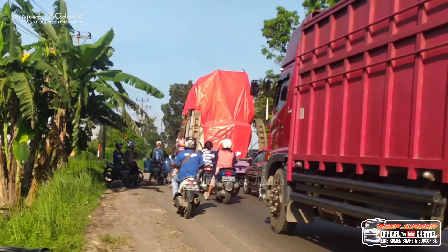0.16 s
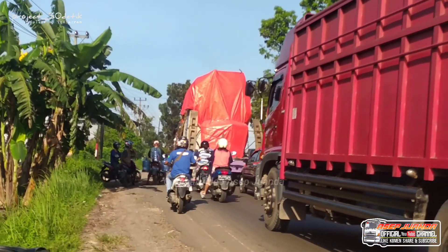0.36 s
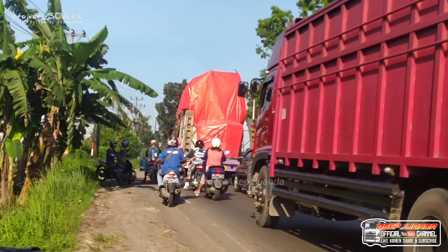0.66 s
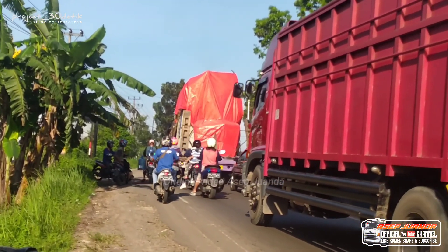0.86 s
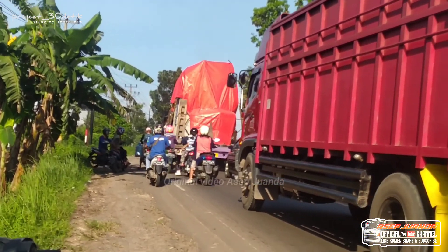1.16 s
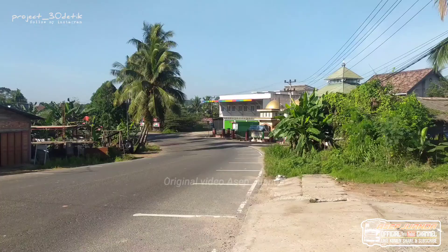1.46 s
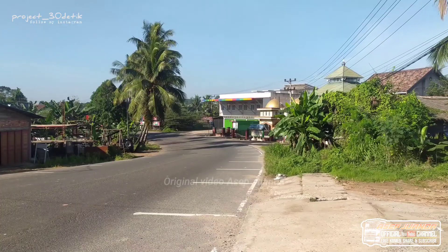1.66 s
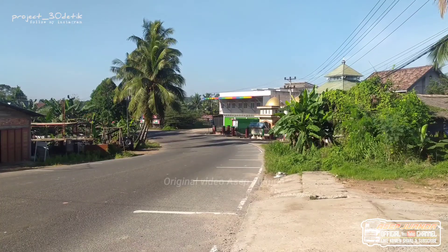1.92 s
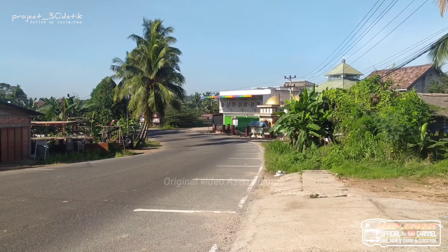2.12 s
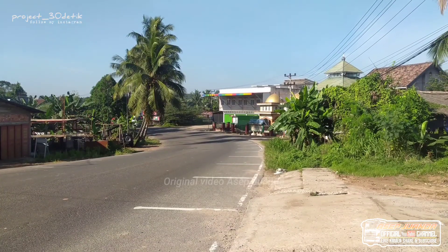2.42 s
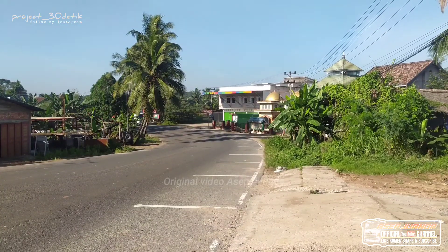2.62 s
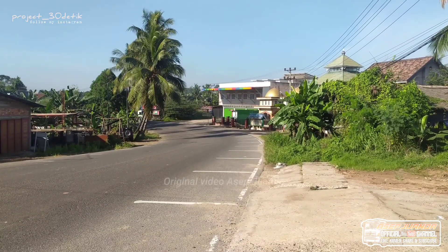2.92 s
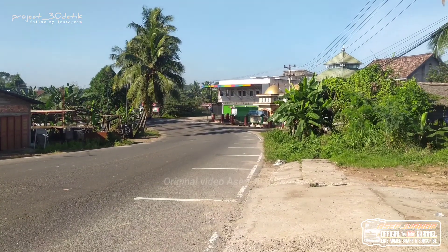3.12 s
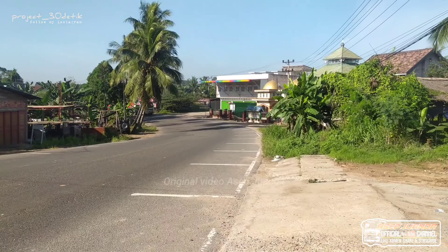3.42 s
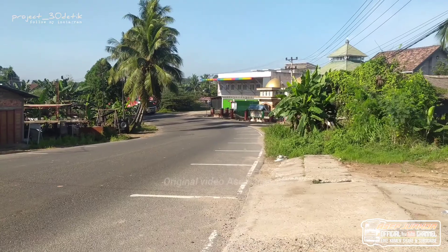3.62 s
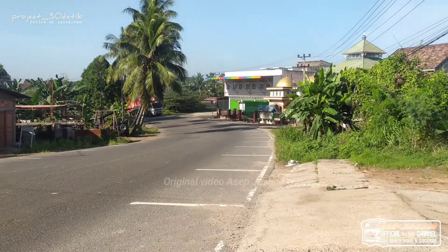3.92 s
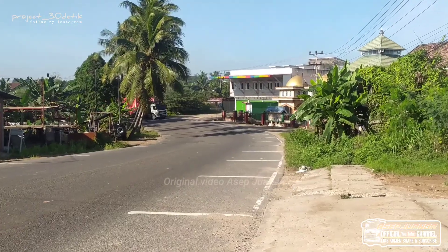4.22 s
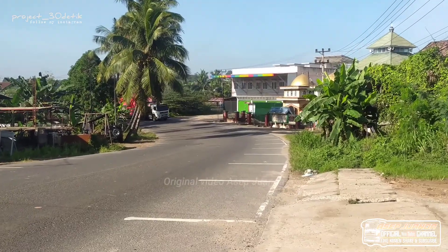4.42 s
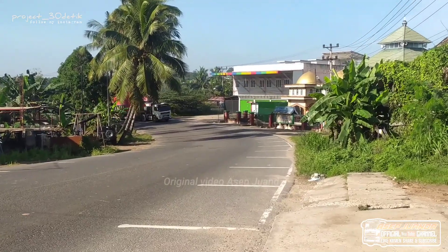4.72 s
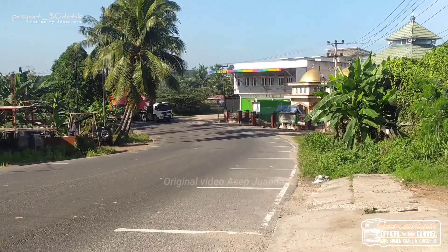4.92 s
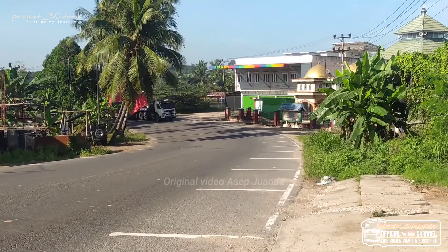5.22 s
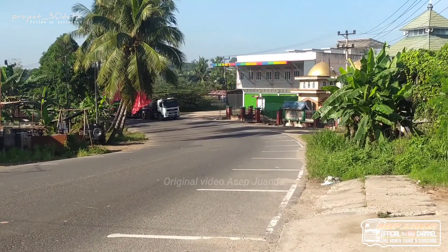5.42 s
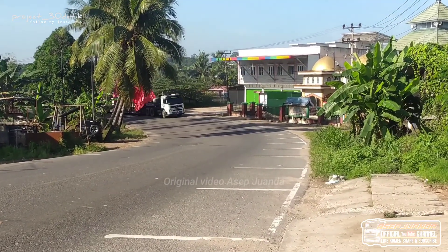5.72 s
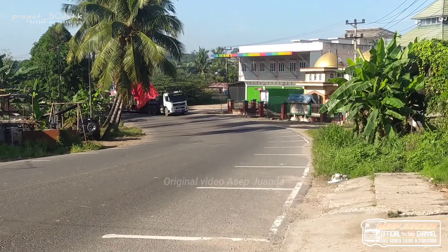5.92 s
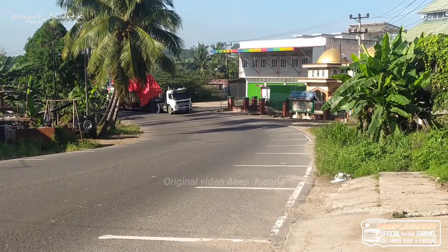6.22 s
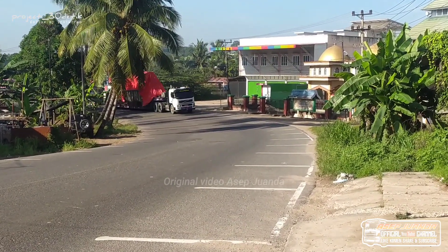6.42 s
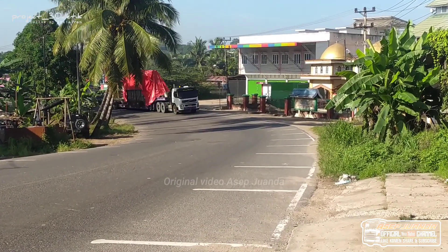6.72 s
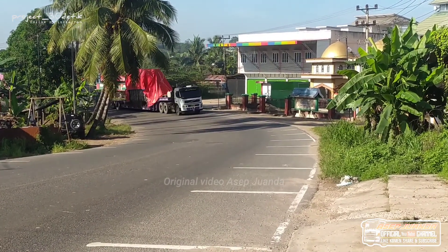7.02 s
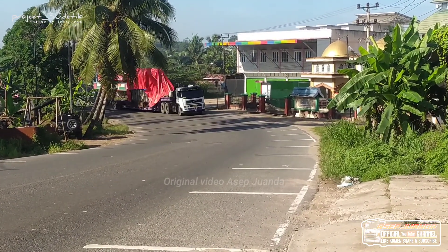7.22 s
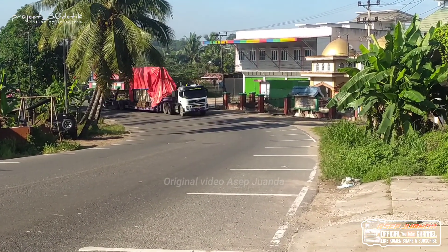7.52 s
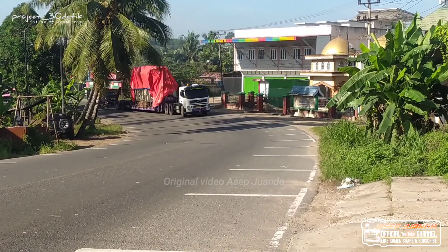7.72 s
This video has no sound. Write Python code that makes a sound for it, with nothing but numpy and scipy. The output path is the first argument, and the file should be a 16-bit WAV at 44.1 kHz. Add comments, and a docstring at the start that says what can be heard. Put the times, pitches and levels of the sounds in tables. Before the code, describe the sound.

A heavy diesel truck throbs and clatters past up close, brief silence, then a loaded truck labours nearer with droning fan while a motorbike idles.

```python
"""Trucks on a roadside

Two moments with a short silence between them. First a diesel truck creeps past at arm's length:
sines make its exhaust note, which throbs against a second engine; shaped noise makes its clatter and hiss.
Then a loaded truck labours up from a far bend: noise and pulses make its roar, sines its fan and turbo whistle.
A motorbike idles close by in low puffs, birds and insects call in gliding tones and noise,
and something metal clinks: a crack of noise and a few ringing tones."""
import sys
import numpy as np
from scipy import signal
from scipy.fft import rfft, irfft, next_fast_len
from scipy.io import wavfile

SR = 44100
rng = np.random.default_rng(int(sys.argv[2]) if len(sys.argv) > 2 else 0)


def materialize(psi):
    """Save the field psi as 16-bit PCM at rate SR to the path in sys.argv[1].

    A 1-D psi becomes a single channel; in a 2-D psi each row is a channel.
    """
    bounded = np.clip(np.atleast_2d(psi).T, -1, 1)
    quanta = np.round(bounded * 32767).astype(np.int16)
    wavfile.write(sys.argv[1], SR, quanta)


N = 346626
TIME = np.arange(N) / SR

NEAR_END_S, FAR_START_S = 1.428, 1.758
CUTOFF_HZ = 15700
# how much later the sound arrives on the left
NEAR_LAG_S, FAR_LAG_S = -0.000095, 0.000088

# exhaust notes of the two engines in the queue: multiple of the firing rate, level/dB
NEAR_ORDERS = [(1, -26.5), (2, -30), (3, -40.5), (4, -40.5)]
SECOND_ORDERS = [(1, -23.5), (2, -45), (3, -44)]
# a fainter tone at the sum of the two firing rates, and a slow shake at half the second one
SUM_TONE_DB, SHAKE_DB = -38.5, -43.5
# both engines ease off: from t/s, to t/s, firing rate before f/Hz, after f/Hz
NEAR_SLOWING = (0.17, 1.2, 40.4, 38.4)
SECOND_SLOWING = (0.25, 0.95, 49.8, 45.3)
# the near truck's engine moves away, so these layers fade: level at first/dB, loss/dB per s
NEAR_RUMBLE, NEAR_CLATTER, NEAR_AIR = (-25.5, 1.4), (-27.5, 2.05), (-31.0, 4)
# tone colours of those layers: f/Hz, relative level/dB per Hz
RUMBLE = [(85, -0.5), (110, -5), (165, 0.5), (225, -2.5), (260, -3.5), (330, -7.5), (450, -12), (660, -9),
          (780, -16.5), (1000, -17)]
CLATTER = [(500, -26.5), (850, -0.5), (1250, 0), (1560, -2.5), (2350, 1.5), (3350, -11.5), (4200, -16.5),
           (5460, -43), (9240, -120)]
NEAR_HISS = [(2290, -33), (3900, -4), (4690, 0), (5090, -1), (5420, -1.5), (7490, 3.5), (9820, 1.5),
             (11300, -9.5), (12100, -19.5), (13300, -12), (15500, -15.5)]
# colour of the low murmur behind both moments: f/Hz, relative level/dB per Hz
STREET_BASS = [(15, -24), (30, -5), (50, -5), (75, 1), (100, -9.5), (140, -20)]
# stereo picture of the near truck: f/Hz, left-right likeness, left minus right level/dB
NEAR_IMAGE = [(100, 1, -2), (400, 0.9, 1), (903, 0.67, 0.5), (1600, 0.42, 1), (2410, -0.24, 5),
              (3700, 0.12, 8), (5000, 0.078, -3), (7500, -0.098, 6.5), (9700, 0.27, -6.5),
              (13000, -0.2, 0.5)]
# brake and spring squeaks: t/s, length/s, start f/Hz, end f/Hz, level/dB, left minus right level/dB,
# rasp as share of pitch
SQUEAKS = [(.06, 0.091, 9750, 10250, -35, -8, .008), (.238, 0.016, 2445, 2300, -27, 12, 0.035),
           (.25, 0.025, 5660, 5500, -35.5, 1, 0.016), (.293, .04, 5550, 5620, -44, 0.5, 0.011),
           (.235, 0.071, 4870, 4490, -39.5, -3.5, 0.032), (.512, .02, 9870, 9700, -33.5, -19, .005),
           (.55, 0.059, 3200, 3100, -36.5, -2, 0.013), (.56, 0.042, 10500, 10800, -35, -4.5, .025)]
# chassis knocks: t/s, level/dB
CHASSIS_KNOCKS = [(1.111, -48), (1.416, -35)]

# stereo picture of the open road: f/Hz, left-right likeness, left minus right level/dB
FAR_IMAGE = [(152, 0.94, -1.5), (383, 0.97, 3.5), (696, 0.95, -2.5), (1200, 0.7, 0.5), (2240, 0.015, 3),
             (3500, 0.62, 2.5), (6000, 0.31, 0), (7200, 0.3, 1.5), (8800, -0.038, -7), (11700, -0.11, 4),
             (12500, -0.26, 14.5)]
# the loaded truck closes in at a crawl
START_M, CRAWL_M_PER_S = 72, 3.3
# it comes out from behind the trees at the bend: from t/s, to t/s, level hidden/dB, level clear/dB
CLEARING = (3.5, 5.5, -7, -1)
# its layers, of which the bass bends round the trees best:
# level at START_M before the trees' shading/dB, share of that shading
EXHAUST_LEVEL, ROAR_LEVEL, CLATTER_LEVEL = (-36.5, 0.071), (-35, 1), (-43, 0.25)
# tone colours of those layers: f/Hz, relative level/dB per Hz
EXHAUST = [(85, -4.5), (110, -8.5), (130, -9), (150, -1), (170, -3.5), (195, -3), (250, -4.5), (310, -7),
           (400, -23.5), (480, -35)]
ROAR = [(250, -17), (380, -0.5), (480, 0), (600, 1.5), (720, -2), (880, -9.5), (1040, -4.5), (1250, -14),
        (1600, -22.5)]
FAR_CLATTER = [(800, 0.5), (1200, -3), (1500, 0), (1800, 1.4), (2200, 3), (2700, -1), (3200, -11),
               (4200, -15), (5500, -16), (7000, -24.5)]
# diesel knock, heard once the cab faces down the road: f/Hz, relative level/dB per Hz
KNOCK_BAND = [(850, -9), (1050, 0.5), (1250, -10), (1500, -2.5), (1800, -12)]
# its rise: from t/s, to t/s, level before/dB, level after/dB
KNOCK_RISE = (3, 5.5, -54.5, -41)
FAN_BLADES, CYLINDERS = 9, 6
# each fan partial in the moving air: flutter strength/dB, waver/cycles, left minus right level/dB
FAN_PARTIALS = [(1.6, 0.095, 0), (2.03, 0.013, -1.5), (2.5, 0.053, 5), (3, .06, -1)]
# the fan's main drone, at twice the blade rate, climbs as the engine picks up under load: t/s, f/Hz
DRONE_PITCH = [(2.3, 522.6), (4.48, 527.2), (4.53, 530), (5.33, 532.3), (6.98, 545), (7.86, 545.2)]
# hum at the blade rate, and the main drone: t/s, level/dB
LOW_DRONE = [(2.3, -59), (3.9, -46), (4.15, -40), (5.0, -34), (5.8, -34), (6.25, -31.5), (6.65, -35),
             (6.88, -44), (7.05, -33), (7.25, -38), (7.48, -32.5), (7.62, -38.5), (7.86, -37)]
DRONE = [(2.2, -52), (2.32, -39.5), (2.67, -36), (2.81, -37.5), (4.42, -29.5), (5.24, -28.5), (5.75, -33),
         (7.23, -25.5), (7.86, -30)]
# the third partial swells and fades as the truck turns; the fourth sounds as the cab swings round:
# loudest at t/s, level there/dB, loss/dB per s squared
HIGH_SWELL, TOP_SWELL = (5.8, -39.5, 1.48), (5.5, -45, 38)
# early on the drone and the third partial each flare briefly: the same columns
DRONE_FLARE, HIGH_FLARE = (1.79, -41, 630), (1.956, -43.5, 410)

# colour of the road's high hiss: f/Hz, relative level/dB per Hz
HIGH_HISS = [(4000, -5.5), (5300, -10), (7100, -1.5), (8200, 2), (9200, 7), (10300, 4), (11200, -7.5),
             (12000, -12), (13600, -17), (14600, -48)]
# the hiss rises and an insect's buzz dies away: from t/s, to t/s, level before/dB, level after/dB
HISS_RISE, INSECT_FADE = (2.5, 4, -51.5, -45.5), (1.5, 6, -50.5, -68)
# colours of the insects' buzz and rasps: f/Hz, relative level/dB per Hz
INSECT_BAND = [(9800, -24), (10150, -10), (10420, -2), (10700, -15), (11100, -21)]
RASP_BAND = [(8300, -21), (9300, -3), (9900, 3), (10400, -3), (11000, -18)]
# an insect's run of short rasps: t/s, level/dB
RASPS = [(2.83, -45), (2.9, -48), (2.965, -46), (3.035, -45), (3.098, -43), (3.16, -45), (3.385, -44),
         (3.425, -47), (3.487, -45)]
RASP_HALF_S = 0.009  # this far from its middle a rasp has a quarter of its height

# the motorbike fires about ten times a second, each cycle a trace longer than the last
FIRST_PUFF_S, IDLE_CYCLE_S, IDLE_SAG_S = 1.7728, 0.10386, 0.000083
PUFF_DB, PUFF_SPREAD_DB = -28, 1.2
PUFF_HZ, PUFF_WIDTH_S = 77, 0.0062
# its idle hunts a little: t/s, how late it fires/s
IDLE_HUNT = [(1.8, -.008), (2.2, .002), (2.6, 0), (3.0, -.008), (3.65, .001), (4.1, -.002), (4.65, -.008),
             (5.05, .002), (5.3, .012), (6.4, .011), (7.2, -.014), (7.65, .004)]
# now and then it fires harder or stumbles: t/s, extra level/dB
ODD_PUFFS = [(1.98, -3), (2.19, 3), (2.81, 4), (3.23, 5.5), (3.65, 3), (4.28, 3), (4.5, -7), (5.03, -3),
             (5.26, 4), (6.0, 4), (6.11, 3), (6.32, -11), (6.43, 3), (6.53, -4), (6.64, 2), (6.75, 6.5),
             (7.16, -13), (7.27, 2), (7.72, 4), (7.83, 4)]

# soft whistled notes and chirps: t/s, length/s, start f/Hz, end f/Hz, level/dB,
# left minus right level/dB, rasp as share of pitch
WHISTLES = [(1.992, 0.16, 2390, 2230, -50, 19, 0.014), (2.467, 0.024, 4780, 4400, -55, 14, .005),
            (2.465, 0.041, 2380, 2560, -40.5, 14, 0.073), (2.504, 0.084, 2530, 2690, -48.5, 12, .065),
            (2.689, 0.082, 1950, 1900, -48, 19.5, 0.037), (2.822, 0.041, 2420, 2450, -45.5, 15, 0.025),
            (2.864, 0.073, 2650, 2490, -49, 12, .06), (4.212, 0.027, 6170, 6700, -49, 16, .035),
            (4.25, 0.043, 3785, 3800, -48, 23, .015), (4.35, 0.047, 3020, 3420, -53, 12, .015),
            (4.501, 0.14, 2210, 2370, -45.5, 5, .003), (4.648, 0.15, 2356, 2430, -40, 8, 0.002),
            (5.194, 0.057, 2130, 1910, -40.5, 9, 0.018), (6.48, 0.086, 2267, 2220, -43, 7, 0.023)]
# a bird's harsh falling calls: t/s, length/s, start f/Hz, level/dB, left minus right level/dB
SCOLDS = [(2.272, 0.034, 5000, -53, 14), (2.288, 0.049, 4400, -46, 15.5), (2.335, .055, 4100, -48, 9),
          (2.52, 0.056, 5680, -58, 13), (3.528, 0.066, 4780, -54, 13), (4.835, 0.055, 4150, -47.5, 15),
          (4.875, 0.076, 3900, -48, 10), (5.02, 0.096, 3190, -50, 10)]
SCOLD_FALL, SCOLD_RASP = 0.66, 0.105  # end pitch over start pitch, rasp as share of pitch
# short high chips, all of one shape: t/s, start f/Hz, level/dB, left minus right level/dB
CHIPS = [(2.478, 7500, -52, 18), (3.905, 7250, -53, 18), (6.88, 7700, -50, 8), (7.13, 7900, -47, 15),
         (7.31, 7750, -49, 11)]
CHIP_S, CHIP_FALL, CHIP_RASP = 0.058, 0.85, 0.035

# the turbo's pitch creeps up, and jumps up once with the boost: t/s, added before f/Hz, added after f/Hz
TURBO_HZ, TURBO_HZ_PER_S, BOOST = 4240, 9.8, (4.5, 4.1, 76)
# its whistle swells in, while a slow fade runs throughout: from t/s, to t/s, before/dB, after/dB
TURBO_ATTACK, TURBO_FADE_DB_PER_S = (2.5, 3.5, -64.5, -42.8), 0.68
# the intake duct favours one pitch of the whistle: f/Hz, half width/Hz
TURBO_DUCT = (4320, 96)
# strength of the warble once a crank turn, and of the sway once an engine cycle
WARBLE_HZ, SWAY_HZ = 52, 17
WARBLE_SLIP_TURNS, WHISTLE_JITTER_HZ = 0.07, 27

# small dry ticks and taps by the road: t/s, level/dB, centre f/Hz
TICKS = [(3.535, -52, 4300), (4.2, -49, 9000), (4.272, -43, 8800), (4.28, -47, 4400), (6.638, -48, 4700),
         (6.972, -50, 3700), (6.987, -43, 4260), (6.997, -44, 3900), (7.233, -42, 8000)]
TICK_FALL_DB_PER_S, TICK_ATTACK_S, TICK_EDGE_DB = 600, 0.002, -20

# the clink's quick contacts: t/s, level/dB
CLINK = [(5.865, -25.5), (5.867, -25.5), (5.868, -23)]
# its ringing tones: f/Hz, level/dB, time to die by 60 dB/s
CLINK_MODES = [(2747, 2.5, 0.036), (2980, -5, .025), (6160, -20, 0.028), (9700, -6, 0.035),
               (10300, -13, 0.038), (13870, -17, .035)]
# colour of its crack: f/Hz, relative level/dB per Hz
CRACK = [(2200, -10), (2800, 7), (3600, -9), (5000, -25), (8000, -9), (10000, 2), (12000, -16),
         (15000, -35)]


def from_db(db):
    """Decibels to gain."""
    return 10 ** (np.asarray(db) / 20)


def rms_one(x):
    """Scale to unit power."""
    return x / np.sqrt(np.mean(x ** 2) + 1e-20)


def in_time(rows):
    """A two-column curve read at every sample."""
    return np.interp(TIME, *np.transpose(rows))


def at_hz(rows, hz):
    """Each column of a spectrum, joined on a log-frequency axis."""
    points, *columns = np.transpose(rows)
    log_hz = np.log(hz + 0.00089)  # keeps 0 Hz out of the logarithm
    return [np.interp(log_hz, np.log(points), c) for c in columns]


def ramp(start_s, end_s, before, after):
    """A value that holds, moves evenly to another and holds again."""
    return np.interp(TIME, [start_s, end_s], [before, after])


def swell(peak_s, peak_db, loss_db):
    """A level that rises to a rounded top and falls again, in dB."""
    return peak_db - np.minimum(loss_db * (TIME - peak_s) ** 2, 60)


def drift(rate):
    """Random wander of unit power, mostly slower than the given rate in Hz."""
    step, settle = 40, 2000  # worked out at every 40th sample, after the filter has settled
    r = np.exp(-2 * np.pi * rate * step / SR)
    noise = rng.standard_normal(N // step + 2 + settle)
    slow = signal.lfilter([1], [1, -2 * r, r * r], noise)[settle:]
    return np.interp(np.arange(N) / step, np.arange(len(slow)), rms_one(slow))


def turns_of(hz):
    """Cycles completed at a changing rate."""
    return np.cumsum(hz) / SR


def pan(db):
    """Left and right gains for a level difference."""
    return from_db(np.array([[db], [-db]]) / 2)


def hiss():
    """Two unrelated white noises."""
    return rng.standard_normal((2, N))


def coloured(pair, spectrum, image, lag_s=0):
    """Shape two signals into stereo of a given colour and picture, left lagging; their average has rms 1."""
    size = next_fast_len(N)
    hz = np.arange(size // 2 + 1) * SR / size
    likeness, balance_db = at_hz(image, hz)
    apart = np.minimum(1, hz / 300) ** 2  # long waves reach both sides alike
    likeness = 1 - apart * (1 - np.clip(likeness, -1, 1))
    balance_db = apart * balance_db
    low_skirt = np.minimum(1, hz / spectrum[0][0]) ** 4
    high_skirt = np.minimum(1, spectrum[-1][0] / (hz + 1)) ** 8
    gain = from_db(at_hz(spectrum, hz)[0]) * low_skirt * high_skirt
    mid, side = rfft(pair, size) * gain * np.sqrt([1 + likeness, 1 - likeness])
    left = (mid + side) * np.exp(-2j * np.pi * hz * lag_s)
    right = mid - side
    balance = from_db([balance_db / 2, -balance_db / 2])
    out = irfft(np.array([left, right]) * balance, size)[:, :N]
    return out / np.std(out.mean(0))


def bursts(firings, depth_db, uneven_db):
    """Noise that jumps up at each firing and sinks by depth_db before the next, with uneven strengths."""
    strength_db = uneven_db * rng.uniform(-1, 1, int(firings[-1]) + 1)
    level_db = strength_db[firings.astype(int)] - depth_db * (firings % 1)
    return rms_one(hiss() * from_db(level_db))


def pulses(firings, uneven_db, rough_db):
    """One click per firing; six strengths and delays recur in turn, like cylinders, and add half-order lines."""
    at = np.flatnonzero(np.diff(np.floor(firings)))
    cylinder = np.arange(len(at)) % CYLINDERS
    out = np.zeros((2, N))
    for path in out:
        late = (rng.uniform(0, 0.00805, CYLINDERS) * SR).astype(int)
        cylinder_db = uneven_db * rng.uniform(-1.3, 1, CYLINDERS)
        chance_db = rough_db * rng.uniform(-0.92, 1, len(at))
        landing = np.minimum(at + late[cylinder], N - 1)
        path[landing] = from_db(cylinder_db[cylinder] + chance_db)
    return rms_one(out)


def ring(clicks, hz, t60):
    """A unit click sets a sine of height about 1 ringing; it dies by 60 dB in t60 seconds."""
    r, w = from_db(-60 / (t60 * SR)), 2 * np.pi * hz / SR
    return signal.lfilter([0, np.sin(w)], [1, -2 * r * np.cos(w), r * r], clicks + 1e-18)


def scatter(x, wet_db, t60):
    """Walls, trees and road return a diffuse tail, different on each side and dulled by the air."""
    t = TIME[:SR // 2]
    tail = rng.standard_normal((2, len(t))) * from_db(-60 * t / t60) * (t > 0.008)
    tail /= np.sqrt(np.sum(tail ** 2, axis=1, keepdims=True))
    tail = signal.sosfilt(signal.butter(2, 9000, fs=SR, output="sos"), tail)
    return x + from_db(wet_db) * signal.fftconvolve(x, tail, axes=1)[:, :N]


def glides(rows):
    """Short tones, each swelling and sliding between two pitches; fast pitch jitter makes them rasp."""
    out, jitter = np.zeros((2, N)), drift(260)
    for s, length, start_hz, end_hz, level_db, pan_db, rasp in rows:
        u = np.linspace(0, 1, int(length * SR))  # progress through the tone
        at = max(int(s * SR), 0) + np.arange(len(u))
        hz = start_hz * (end_hz / start_hz) ** u * (1 + rasp * jitter[at])
        shape = 2 * np.sqrt(u * (1 - u))
        tone = np.sqrt(2) * np.sin(2 * np.pi * turns_of(hz))
        out[:, at] += pan(pan_db) * from_db(level_db) * shape * tone
    return out


def exhaust_note(firings, orders, rough_db):
    """The lowest orders of an engine, each a sine of slightly unsteady level."""
    note = 0
    for k, db in orders:
        level = from_db(db + rough_db * drift(13))
        note = note + np.sqrt(2) * level * np.sin(2 * np.pi * k * firings)
    return note


def near_truck():
    """Two slowing exhaust notes throb against each other under clatter, hiss, knocks and squeaks."""
    rumble_db, clatter_db, hiss_db = (db - loss * TIME for db, loss in (NEAR_RUMBLE, NEAR_CLATTER, NEAR_AIR))
    firings = turns_of(ramp(*NEAR_SLOWING))
    second = turns_of(ramp(*SECOND_SLOWING)) - 1 / 3
    throb = exhaust_note(firings, NEAR_ORDERS, rough_db=0.4)
    throb += exhaust_note(second, SECOND_ORDERS, rough_db=0.4)
    throb += exhaust_note(firings + second, [(1, SUM_TONE_DB)], rough_db=1.5)
    throb += exhaust_note(second / 2, [(1, SHAKE_DB)], rough_db=1.5)
    bass = from_db(-47) * coloured(hiss(), STREET_BASS, NEAR_IMAGE)
    surges = bursts(firings, depth_db=1, uneven_db=2)
    rumble = from_db(rumble_db) * coloured(surges, RUMBLE, NEAR_IMAGE, NEAR_LAG_S)
    # each knock starts at once and falls by 450 dB per s
    knocks = sum(from_db(db - 450 * np.abs(TIME - s)) * (TIME > s) for s, db in CHASSIS_KNOCKS)
    # combustion flares, with injector and valves ticking three times per firing
    ticking = pulses(3 * firings, uneven_db=2, rough_db=2)
    rattle = rms_one(bursts(firings, depth_db=3.5, uneven_db=0) + 0.32 * ticking)
    clatter = (from_db(clatter_db) + knocks) * coloured(rattle, CLATTER, NEAR_IMAGE, 2 * NEAR_LAG_S)
    breath = bursts(firings, depth_db=0, uneven_db=2)
    air = from_db(hiss_db) * coloured(breath, NEAR_HISS, NEAR_IMAGE)
    squeaks = scatter(glides(SQUEAKS), wet_db=3, t60=0.12)
    return throb + bass + rumble + clatter + air + squeaks


def approach(start_db, shading):
    """Gain of a layer of the loaded truck: inverse distance, less what the trees hide."""
    metres = np.maximum(START_M - CRAWL_M_PER_S * TIME, 1)
    return from_db(start_db + shading * ramp(*CLEARING)) * START_M / metres


def loaded_truck():
    """One crank drives six cylinders and a nine-bladed fan; the turbo whistle warbles loosely with it."""
    blade_hz = in_time(DRONE_PITCH) / 2
    crank = turns_of(blade_hz * (1 + 0.002 * drift(17))) / FAN_BLADES
    firings = crank * CYLINDERS / 2  # four-stroke: each cylinder fires every second turn

    def on_road(source, colour):
        return coloured(source, colour, FAR_IMAGE, FAR_LAG_S)

    beats = rms_one(hiss() + 0.65 * pulses(firings, uneven_db=3.5, rough_db=0.5))
    exhaust = approach(*EXHAUST_LEVEL) * on_road(beats, EXHAUST)
    surges = bursts(firings, depth_db=2.5, uneven_db=2)
    growl = rms_one(surges + 0.36 * pulses(firings, uneven_db=8, rough_db=4.5))
    roar = approach(*ROAR_LEVEL) * on_road(growl, ROAR)
    rattle = bursts(firings, depth_db=2.5, uneven_db=2)
    clatter = approach(*CLATTER_LEVEL) * on_road(rattle, FAR_CLATTER)
    knock = from_db(ramp(*KNOCK_RISE)) * on_road(bursts(firings, depth_db=4.5, uneven_db=2), KNOCK_BAND)
    return exhaust + roar + clatter + knock + fan(crank, blade_hz) + turbo(crank)


def fan(crank, blade_hz):
    """Passing blades chop the air into a tone at the blade rate and its multiples, each fluttering."""
    drone_db = np.maximum(in_time(DRONE), swell(*DRONE_FLARE))
    high_db = np.maximum(swell(*HIGH_SWELL), swell(*HIGH_FLARE))
    partial_db = [in_time(LOW_DRONE), drone_db, high_db, swell(*TOP_SWELL)]
    lag_s = np.array([[FAR_LAG_S], [0]])
    blades = FAN_BLADES * crank - lag_s * blade_hz
    out = 0
    for k, (db, (flutter_db, waver, pan_db)) in enumerate(zip(partial_db, FAN_PARTIALS), start=1):
        cycles = k * blades + waver * drift(8.3)
        flutter = flutter_db * (0.7 * drift(38) + 0.48 * drift(6.5))
        out = out + pan(pan_db) * np.sqrt(2) * from_db(db + flutter) * np.sin(2 * np.pi * cycles)
    return out


def roadside():
    """Low traffic murmur, a high hiss, insects and birds in the trees, a few dry ticks."""
    bass = from_db(-39) * coloured(hiss(), STREET_BASS, FAR_IMAGE)
    high_level = from_db(ramp(*HISS_RISE) + 0.82 * drift(15))
    high = high_level * coloured(hiss(), HIGH_HISS, FAR_IMAGE)
    return bass + high + insects() + birds() + ticks()


def insects():
    """One insect's thin buzz of narrow noise dies away; another answers with a run of short rasps."""
    buzz_level = from_db(ramp(*INSECT_FADE) + 1.8 * drift(27))
    buzz = buzz_level * coloured(hiss(), INSECT_BAND, FAR_IMAGE)
    rasps = sum(from_db(db) / (1 + ((TIME - s) / RASP_HALF_S) ** 2) ** 2 for s, db in RASPS)
    return buzz + rasps * coloured(hiss(), RASP_BAND, FAR_IMAGE)


def motorbike():
    """One cylinder puffs once a cycle: a pressure hump between two dips, then the silencer hums on."""
    n = np.arange((N / SR - FIRST_PUFF_S) // IDLE_CYCLE_S)
    due = FIRST_PUFF_S + IDLE_CYCLE_S * n + IDLE_SAG_S * n ** 2 / 2
    late = np.interp(due, *np.transpose(IDLE_HUNT))
    at = ((due + late) * SR).astype(int)
    at = at[at < N]
    puffs = np.zeros(N)
    puffs[at] = from_db(PUFF_DB + PUFF_SPREAD_DB * np.clip(rng.standard_normal(len(at)), -2, 1.5))
    for s, extra_db in ODD_PUFFS:
        nearest = at[np.argmin(np.abs(at / SR - s))]
        puffs[nearest] *= from_db(extra_db)
    t = np.arange(-SR // 40, SR // 40) / SR
    hump = np.cos(2 * np.pi * PUFF_HZ * t) * np.exp(-(t / PUFF_WIDTH_S) ** 2 / 2)
    thump = signal.fftconvolve(puffs, hump, "same")
    hum = from_db(-11) * ring(puffs, hz=76, t60=0.37) + from_db(-14.5) * ring(puffs, hz=149.4, t60=0.3)
    return thump + hum


def birds():
    """Gliding tones make whistles, scolds and chips, with an echo; the scolds have the most echo."""
    scolds = [(s, length, hz, hz * SCOLD_FALL, db, side, SCOLD_RASP) for s, length, hz, db, side in SCOLDS]
    chips = [(s, CHIP_S, hz, hz * CHIP_FALL, db, side, CHIP_RASP) for s, hz, db, side in CHIPS]
    far = scatter(glides(scolds), wet_db=3, t60=0.55)
    flicker = from_db(2 * drift(90) - 1)
    close = scatter(glides(chips + WHISTLES) * flicker, wet_db=-7, t60=0.25)
    return far + close


def turbo(crank):
    """A whistle whose pitch arches once a crank turn, loudest as it sweeps through the duct's resonance."""
    turns = crank + WARBLE_SLIP_TURNS * drift(4.1)
    arch = np.pi * np.abs(np.sin(np.pi * turns)) - 2  # averages zero
    warble = WARBLE_HZ * arch * (1 + 0.2 * drift(9))
    sway = SWAY_HZ * np.sin(np.pi * turns)
    boost_s, hz_before, hz_after = BOOST
    boost = np.where(TIME < boost_s, hz_before, hz_after)
    hz = TURBO_HZ + TURBO_HZ_PER_S * TIME + boost + warble + sway
    duct_hz, half_width_hz = TURBO_DUCT
    duct = 1 / np.hypot(1, (hz - duct_hz) / half_width_hz)
    level_db = ramp(*TURBO_ATTACK) - TURBO_FADE_DB_PER_S * TIME + 1.6 * drift(23)
    tone = np.sin(2 * np.pi * turns_of(hz + WHISTLE_JITTER_HZ * drift(150)))
    opposed = np.array([[1], [-1]])  # left and right swing opposite ways
    return scatter(pan(15.2) * opposed * tone * duct * from_db(level_db), wet_db=-9, t60=0.12)


def ticks():
    """Each tick is a short soft-edged crack of noise around a pitch of its own."""
    out, noise = 0, hiss()
    for s, db, hz in TICKS:
        age = np.maximum(TIME - s, 0)
        band = [(hz / np.sqrt(2), TICK_EDGE_DB), (hz, 0), (hz * np.sqrt(2), TICK_EDGE_DB)]
        level = np.minimum(age / TICK_ATTACK_S, 1) * from_db(db - TICK_FALL_DB_PER_S * age)
        out = out + level * coloured(noise, band, FAR_IMAGE)
    return pan(6.7) * out


def clink():
    """A brief metallic chatter cracks at each contact, rings out and scatters along the street."""
    ringing = np.zeros((2, N))
    for hz, db, t60 in CLINK_MODES:
        contacts = np.zeros(N)
        for s, contact_db in CLINK:
            whole_cycles_s = round(s * hz) / hz  # so that each contact swells the ring
            contacts[round(whole_cycles_s * SR)] = from_db(contact_db + db)
        ringing += ring(contacts, hz, t60)
    crack_level = sum(from_db(db - 7 - 660 * np.abs(TIME - s)) * (TIME > s) for s, db in CLINK)
    crack = crack_level * coloured(hiss(), CRACK, FAR_IMAGE)
    return scatter(pan(4.5) * (ringing + crack), wet_db=-9.5, t60=0.93)


def scene():
    """The queue, a moment of silence, then the open road."""
    fade_s = 0.0033
    queue = np.clip((NEAR_END_S - TIME) / fade_s + 1, 0, 1)
    road = np.clip((TIME - FAR_START_S) / fade_s, 0, 1)
    return queue * near_truck() + road * (loaded_truck() + motorbike() + clink() + roadside())


def record(dry):
    """The treble is cut steeply above CUTOFF_HZ."""
    return signal.sosfilt(signal.ellip(10, 0.1, 90, CUTOFF_HZ, fs=SR, output="sos"), dry)


dry = scene()
out = record(dry)
materialize(out)
```